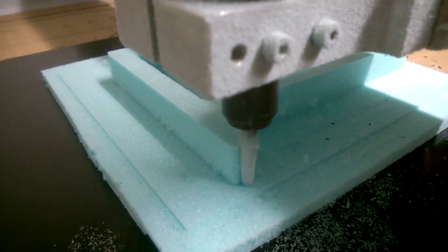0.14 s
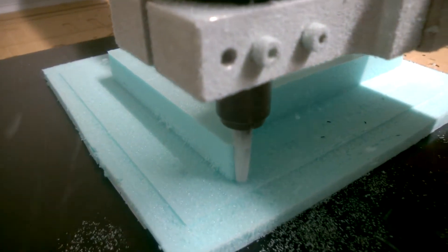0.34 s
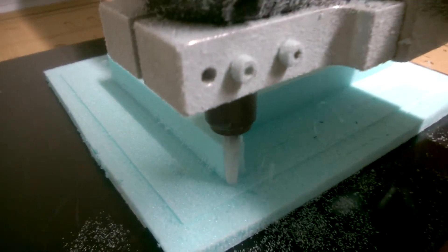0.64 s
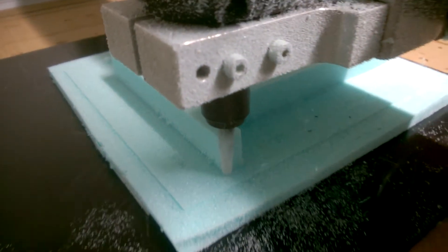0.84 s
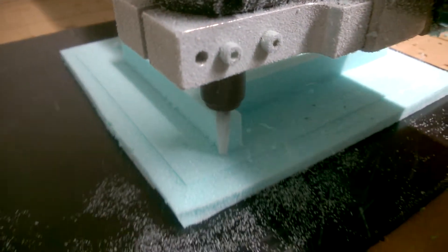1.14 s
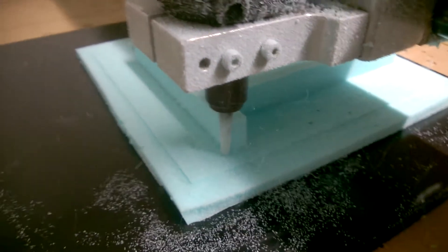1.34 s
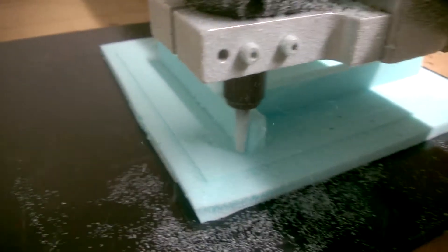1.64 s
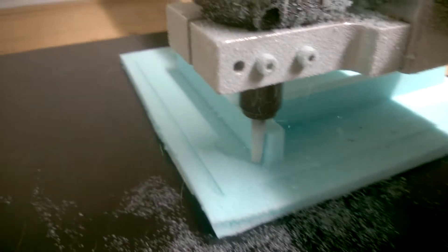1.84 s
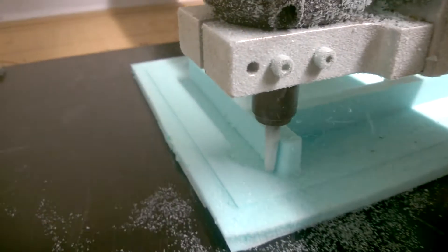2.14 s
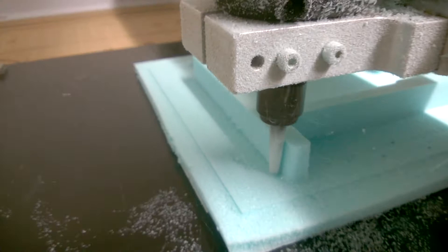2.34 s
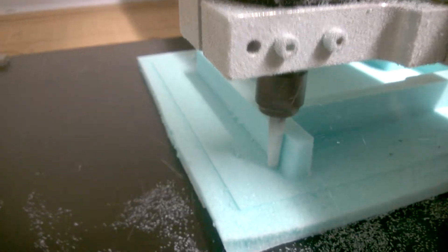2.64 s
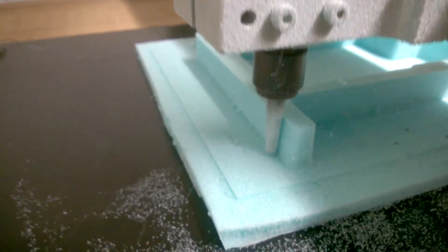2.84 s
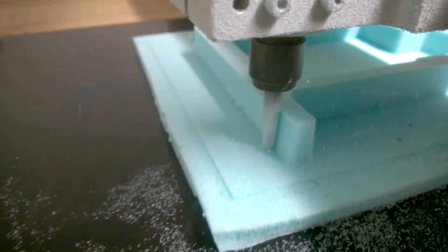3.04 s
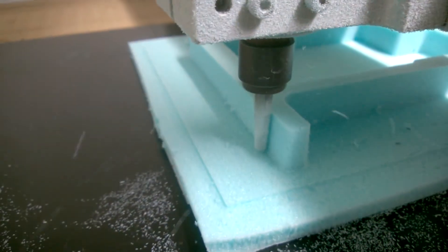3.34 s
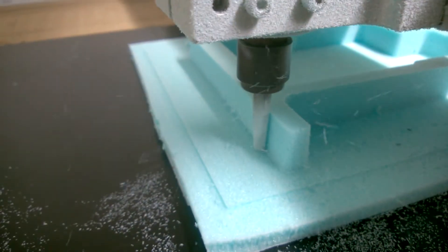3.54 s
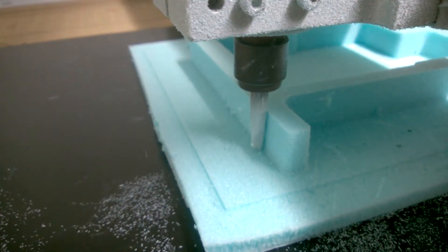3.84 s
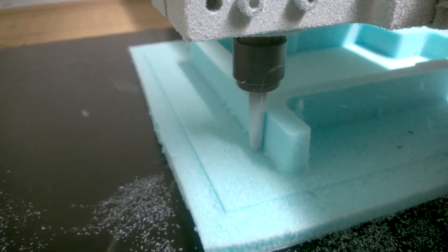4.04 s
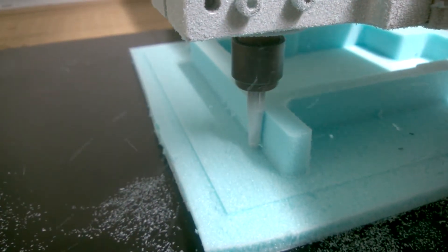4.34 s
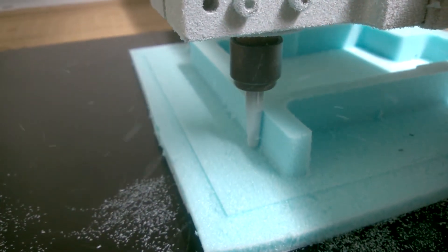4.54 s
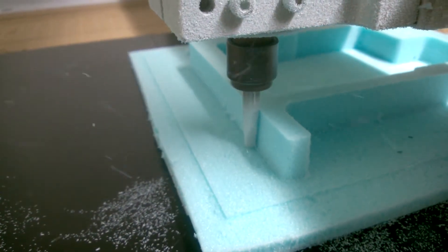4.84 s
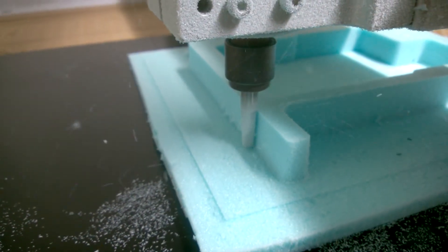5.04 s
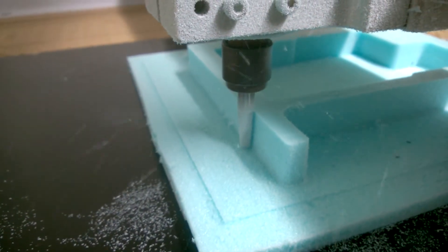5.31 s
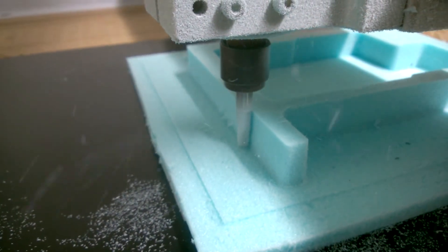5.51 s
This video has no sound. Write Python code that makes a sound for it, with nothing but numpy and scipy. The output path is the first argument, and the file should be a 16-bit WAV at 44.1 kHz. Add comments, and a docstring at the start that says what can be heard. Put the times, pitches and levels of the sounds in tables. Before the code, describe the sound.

A small router spindle mills foam board very close to the microphone, holding a steady high whine for nearly six seconds. From the start its cooling air blows on the left side of the microphone, a loud rumbling rush with some hiss and a few dull pops between 0.8 and 1.2 seconds. The gusts then weaken and are mostly gone by 3 seconds. The whine dips briefly around 0.7 seconds. From about 1.1 seconds the cutter squeals and chatters in quick, uneven bites, strongest until about 3 seconds, with short piercing notes and a fine sizzle of tearing foam. The whine moves to the right from about 2.3 seconds. After 4 seconds the squealing calms into lighter nibbling while the high whine and sizzle continue to the end. Thin bearing whistles, a soft fan rush and a faint motor hum lie underneath throughout.

```python
"""Router spindle milling foam board, very close

The cutter whines on multiples of the spindle speed and chatters just below them; foam cells tear.
The bearings sing, the feed motors hum, the fan rushes.
At first the cooling air of the spindle blows on the left microphone port."""
import sys
import numpy as np
from scipy import signal
from scipy.io import wavfile
from scipy.ndimage import uniform_filter1d

SR = 44100
rng = np.random.default_rng(int(sys.argv[2]) if len(sys.argv) > 2 else 0)


def master_out(mix):
    """Clip the mix to full scale and print it as 16-bit PCM to the path in sys.argv[1]."""
    frames = np.transpose(np.atleast_2d(mix))
    ceiling = np.clip(frames, -1, 1)
    pcm = np.round(ceiling * 32767).astype(np.int16)
    wavfile.write(sys.argv[1], SR, pcm)


N = 250047
TIME = np.arange(N) / SR
BLOCK = 64  # samples per slow value
CUTOFF_HZ = 15800
CHATTER_WIDTH_HZ, SKIRT_WIDTH_HZ, SKIRT_BELOW_HZ = 4.5, 27, 22

# Spindle speed. Each row: time in seconds, revolutions per second.
SPINDLE_SPEED = [(0, 189.2), (.8, 189.3), (1.2, 189.9), (1.8, 189), (2.4, 188.1), (3.3, 188.4),
                 (4.2, 188.8), (5.67, 188.85)]
FINAL_SPEED_HZ = SPINDLE_SPEED[-1][1]
# Chatter. Each row: time in seconds, power share 0-1, offset below the locked lines in Hz.
CHATTER_SLIP = [(0, 0.3, 14.6), (0.801, 0.47, 22.6), (1.3, .94, 33), (2.9, .96, 29), (3.7, .65, 20),
                (4.4, .35, 17), (5.67, .25, 15)]
# Whine position. Each row: time in seconds, left over right in dB near 3.5 kHz, the same near 7 kHz.
WHINE_PAN = [(0.0, 3, -2), (1.15, 4.5, -2.5), (1.44, -2.5, -11), (1.71, 5.5, -6), (2.3, -6, -18),
             (2.59, 1, -14), (2.81, -8, -38), (3.09, -10.5, -44), (4.22, -15, -55), (5.67, -4, -31)]
# Loudness of bearing tones and fan rush, dipping near 0.65 s. Each row: time in seconds, gain in dB.
MOTOR_GAIN = [(0, -2), (.4, -1), (.65, -11), (.9, -7), (1.3, -1), (2, -1), (3, -0.5), (4.3, 0), (5.67, 0.5)]
# High whine. Each row: time in seconds, then collet, flutes, rasp and foam sizzle in relative dB.
HIGH_LEVELS = [(0.0, -36.5, -41.5, -37, -37.5), (0.31, -33.5, -37, -42, -38), (0.7, -47, -45, -53, -48),
               (1.14, -30, -31.5, -39.5, -40), (1.61, -30, -36.5, -36.5, -36.5),
               (2.24, -34, -37, -41.5, -40), (2.4, -29, -40, -35, -40.5), (2.53, -30.5, -37.5, -42, -37),
               (3.65, -38.5, -33, -37, -40), (4.74, -33, -31.5, -43, -43), (4.82, -37, -32, -41, -42.5),
               (5.6, -33, -34.5, -47, -38.5)]


def from_db(db):
    """Decibels to gain."""
    return 10 ** (np.asarray(db) / 20)


def rms_one(x):
    """Scale to unit power."""
    return x / np.sqrt(np.mean(np.abs(x) ** 2) + 1e-20)


def in_time(rows):
    """Each value column of a curve at every sample."""
    times_s, *columns = np.transpose(rows)
    return [np.interp(TIME, times_s, column) for column in columns]


def at_hz(points, hz):
    """Read a spectrum on a log-frequency axis."""
    points_hz, values = np.transpose(points)
    return np.interp(np.log(hz), np.log(points_hz), values)


def bumps(rows, half_s):
    """A bell of the given height at each time."""
    return sum(height * np.exp(-np.minimum(((TIME - s) / half_s) ** 2, 20)) for s, height in rows)


def left_right(pan_db):
    """Two gains of mean power 1."""
    return np.sqrt(2 / (1 + from_db(np.array([-2 * pan_db, 2 * pan_db]))))


def two_ports(tone, apart_rad, pan_db):
    """The two ports hear a tone at different phases and levels."""
    return np.array([tone.real, (tone * np.exp(1j * apart_rad)).real]) * left_right(pan_db)


def flutter(width_hz):
    """Slow complex noise of unit power, one value per block."""
    pole = np.exp(-2 * np.pi * width_hz * BLOCK / SR)
    white = rng.standard_normal((2, 2 * (N // BLOCK + 2)))
    slow = signal.lfilter([1], [1, -2 * pole, pole * pole], white[0] + 1j * white[1])
    return rms_one(slow[len(slow) // 2:])


def smooth_up(slow):
    """Interpolate block values to every sample."""
    slow = slow.astype(np.complex64)
    ramp = np.arange(BLOCK, dtype=np.float32) / BLOCK
    return (slow[:-1, None] + np.diff(slow)[:, None] * ramp).ravel()[:N]


def bandpass(x, low_hz, high_hz):
    """Butterworth band-pass."""
    return signal.sosfilt(signal.butter(2, [low_hz, high_hz], "band", fs=SR, output="sos"), x)


def noise_bands(top_hz):
    """Yield centre in Hz and stereo noise for half-octave bands of equal density."""
    edges_hz = CUTOFF_HZ / 2 ** np.arange(0, 10, .5)[::-1]
    white = rng.standard_normal((2, 2, N))
    for k, (low_hz, high_hz) in enumerate(zip(edges_hz, edges_hz[1:])):
        if low_hz < top_hz:
            yield np.sqrt(low_hz * high_hz), bandpass(white[k % 2], low_hz, high_hz)


def grip():
    """Cutter engagement in dB: each bite catches at once, holds and lets go."""
    # Bites. Each row: start in seconds, end in seconds, grip in dB.
    bites = [(.02, .085, -1), (.098, .121, 7), (.141, .184, 3.5), (.219, .259, 5.5), (.265, .33, 6),
             (.365, .397, 3), (.435, .455, 8), (.465, .523, 6), (.579, .587, 11), (.813, .835, -5),
             (.857, .881, 3), (.904, .929, 7.5), (.955, .968, 9), (.985, 1.045, 0), (1.062, 1.088, 6),
             (1.134, 1.166, 7.5), (1.192, 1.216, 8), (1.24, 1.292, 4), (1.33, 1.372, 5.5),
             (1.395, 1.427, 3), (1.457, 1.476, 3.5), (1.522, 1.64, 4.5), (1.654, 1.711, 4),
             (1.735, 1.765, 2), (1.77, 1.798, 7.5), (1.852, 1.87, 5.5), (1.878, 1.912, 5.5),
             (1.932, 1.994, 1), (2.01, 2.068, 5.5), (2.115, 2.148, 3.5), (2.172, 2.27, 1),
             (2.301, 2.474, 3.5), (2.408, 2.434, 11), (2.506, 2.597, 5), (2.617, 2.66, 5),
             (2.703, 2.752, 5), (2.76, 2.81, -0.5), (2.821, 2.869, 8.5), (2.902, 2.916, 3),
             (2.948, 2.961, 4.5), (2.974, 2.997, 1), (3.033, 3.063, 7.5), (3.068, 3.085, 2),
             (3.11, 3.146, 4), (3.161, 3.176, 6.5), (3.196, 3.248, 1), (3.26, 3.335, 2), (3.365, 3.383, 3),
             (3.404, 3.422, 3.5), (3.436, 3.461, 1), (3.498, 3.539, 6), (3.561, 3.589, 6), (3.609, 3.62, 3),
             (3.634, 3.648, 4), (3.662, 3.683, 2.5), (3.731, 3.755, 8), (3.769, 3.799, 2), (3.83, 3.902, 5),
             (3.915, 3.963, 6.5), (4.015, 4.046, 3), (4.058, 4.078, 6)]
    # Spans of random nibbling. Each row: start in seconds, end in seconds.
    nibbling = [(.6, .8), (4.12, 5.67)]
    # Grip left between bites. Each row: time in seconds, grip in dB.
    slack = [(0, -6), (1.3, -8), (1.8, -4), (2.7, -5.5), (3.1, -8.5), (4.2, -6), (5.67, -15)]
    nibble_s, gap_s, nibble_db = (.014, .06), (.01, .026), 3.8
    rise_db_per_s, fall_db_per_s = 1200, 1100
    nibbles = []
    for start_s, stop_s in nibbling:
        while start_s < stop_s:
            end_s = start_s + rng.uniform(*nibble_s)
            nibbles.append((start_s, end_s, nibble_db + rng.standard_normal()))
            start_s = end_s + rng.uniform(*gap_s)
    time_s = TIME[::32]
    start_s, end_s, level_db = np.transpose(list(bites) + nibbles)[:, :, None]
    each_db = (level_db - rise_db_per_s * np.maximum(start_s - time_s, 0)
               - fall_db_per_s * np.maximum(time_s - end_s, 0))
    return np.maximum(np.interp(TIME, time_s, each_db.max(axis=0)), in_time(slack)[0])


def resonance_levels():
    """Relative dB of each resonance; cutter and foam wall ring up, swing with the grip, then calm."""
    # Spindle body whine. Each row: time in seconds, level in relative dB.
    body_curve = [(0, -22.5), (.25, -27), (.65, -31.5), (1.2, -24.5), (1.5, -40), (2.2, -35), (2.5, -33.5),
                  (3.8, -31.5), (5.67, -39)]
    # Ringing. Each row: time in seconds, cutter squeal and foam wall in relative dB.
    ringing = [(0, -37.5, -37), (.6, -44, -44.5), (.9, -34.5, -31.5), (1.2, -26, -25), (1.9, -24.5, -25),
               (2.25, -29, -29.5), (2.5, -31, -29), (3.1, -27, -37), (4.4, -38.5, -51.5), (5.6, -46, -49)]
    grip_db = grip()
    body, = in_time(body_curve)
    squeal, wall = in_time(ringing)
    collet, flutes, rasp, sizzle = in_time(HIGH_LEVELS)
    return (body + .65 * grip_db, squeal + grip_db, wall + .75 * grip_db,
            collet + .2 * grip_db, flutes, rasp + .1 * grip_db, sizzle)


def self_limit(slow):
    """Self-excited ringing limits its own height, so mostly its phase wanders."""
    return rms_one(slow / (np.abs(slow) + .1))


def whine(turn_rad, bite, orders, partials_db, level_db, pan_db, *,
          skirt, own, scatter_rad, slip_scale, swell_db, wander_db, apart_rad, even_blocks=45):
    """Evenly spaced partials, each a locked line, a chatter line below it and a ragged skirt."""
    # skirt: power share of the skirt; own: share of flutter not common to all partials
    slow_bite, fast_bite = bite
    time_s = np.arange(len(slow_bite)) * BLOCK / SR
    points_s, share, slip_hz = np.transpose(CHATTER_SLIP)
    share = np.interp(time_s, points_s, share)
    slip_cycles = np.cumsum(np.interp(time_s, points_s, slip_hz)) * BLOCK / SR
    locked = np.sqrt((1 - skirt) * (1 - share))
    slipping = np.sqrt((1 - skirt) * share) * np.exp(-2j * np.pi * slip_scale * slip_cycles)
    trailing = np.sqrt(skirt) * np.exp(-2j * np.pi * slip_scale * SKIRT_BELOW_HZ * time_s)
    rotation = np.exp(1j * turn_rad).astype(np.complex64)
    carrier, step = rotation ** int(orders[0]), rotation ** int(orders[1] - orders[0])
    tone, power = np.zeros(N, np.complex64), 0
    for gain in from_db(partials_db):
        slow = self_limit(np.sqrt(1 - own) * slow_bite + np.sqrt(own) * flutter(CHATTER_WIDTH_HZ))
        fast = np.sqrt(1 - own) * fast_bite + np.sqrt(own) * flutter(SKIRT_WIDTH_HZ)
        wander = from_db(wander_db * flutter(2.5).real)
        # the less the phases scatter, the more each revolution is one burst
        scatter = np.exp(1j * scatter_rad * rng.standard_normal())
        swing = gain * wander * (locked + slipping * slow + trailing * fast) * scatter
        tone += smooth_up(swing) * carrier
        carrier = carrier * step
        power = power + np.abs(swing) ** 2
    running_rms = np.sqrt(uniform_filter1d(power, size=even_blocks))
    swell = from_db(swell_db * flutter(17).real) / running_rms
    return 2 * two_ports(tone * smooth_up(swell).real * from_db(level_db), apart_rad, pan_db)


def cutter(turn_rad, levels_db):
    """Every revolution excites the resonances of spindle, cutter and foam."""
    # Strongest partials. Each row: multiple of the speed, level in relative dB.
    partials = [(16, -14), (17, -11), (18, 0), (19, -14.5), (20, -5.5), (21, -5.5), (22, -7), (23, -16),
                (24, -9), (25, -15), (26, -13.5), (27, -19), (28, -12), (29, -12), (30, -14), (31, -20),
                (32, -19), (33, -19), (34, -15), (35, -24), (36, -20)]
    # Spectrum above those. Each row: frequency in Hz, level in relative dB.
    treble = [(4060, -32), (6900, 5), (8150, 12), (8640, 10), (9560, 9.5), (10300, 1), (11800, -7),
              (14200, -10), (15100, -13), (15800, -9)]
    # Topmost fizz. Each row: time in seconds, dB added to the sizzle curve.
    fizz_curve = [(0, -9), (1.2, -14.5), (2.6, -10), (3.6, -10), (4.6, -4), (5.67, -7)]
    # Brief shrieks an octave above the foam wall's ringing. Each row: time in seconds, gain in dB.
    shrieks = [(1.35, -35), (1.68, -50), (1.79, -33), (1.9, -30.5), (2.05, -33), (2.42, -30), (2.83, -42)]
    orders, partials_db = np.transpose(partials)
    body, squeal, wall, collet, flutes = np.split(np.arange(len(orders)), [2, 4, 8, 11])
    octave, rasp, sizzle, fizz = [40, 42, 44], np.arange(37, 46), np.arange(46, 56), np.arange(56, 84)
    body_db, squeal_db, wall_db, collet_db, flutes_db, rasp_db, sizzle_db = levels_db
    low_pan_db, high_pan_db = in_time(WHINE_PAN)
    mid_pan_db = (low_pan_db + high_pan_db) / 2
    fizz_db = sizzle_db + in_time(fizz_curve)[0]
    bite = flutter(CHATTER_WIDTH_HZ), flutter(SKIRT_WIDTH_HZ)  # uneven bite, common to all resonances

    def low_whine(rows, level_db, pan_db, **texture):
        return whine(turn_rad, bite, orders[rows], partials_db[rows], level_db, pan_db, **texture)

    def high_whine(multiples, level_db, pan_db, **texture):
        treble_db = at_hz(treble, multiples * FINAL_SPEED_HZ)
        return whine(turn_rad, bite, multiples, treble_db, level_db, pan_db, wander_db=3.5, **texture)

    out = low_whine(body, body_db - 6.8, low_pan_db + 6, skirt=.33, own=.3, scatter_rad=.4,
                    slip_scale=.7, swell_db=1.5, wander_db=1, apart_rad=.6, even_blocks=15)
    out += low_whine(squeal, squeal_db - 1.5, low_pan_db - .5, skirt=.01, own=.1, scatter_rad=.6,
                     slip_scale=1, swell_db=1.5, wander_db=.6, apart_rad=.55, even_blocks=11)
    out += low_whine(wall, wall_db - 1, low_pan_db + .8, skirt=.005, own=.7, scatter_rad=2.5,
                     slip_scale=.85, swell_db=1.5, wander_db=2, apart_rad=1.75, even_blocks=27)
    out += low_whine(collet, collet_db - 3.5, mid_pan_db, skirt=.08, own=.6, scatter_rad=1.3,
                     slip_scale=1, swell_db=1.8, wander_db=2, apart_rad=1.8)
    out += low_whine(flutes, flutes_db - 2, high_pan_db + .5, skirt=.18, own=.5, scatter_rad=.6,
                     slip_scale=1.1, swell_db=1.5, wander_db=1, apart_rad=1.5)
    out += high_whine(rasp, rasp_db - 4.5, high_pan_db - .5, skirt=.56, own=.85, scatter_rad=.15,
                      slip_scale=.93, swell_db=3.5, apart_rad=1.77)
    out += high_whine(sizzle, sizzle_db - 3, high_pan_db + 1, skirt=1, own=.36, scatter_rad=.18,
                      slip_scale=.77, swell_db=1.3, apart_rad=1.4)
    out += high_whine(fizz, fizz_db, .23 * high_pan_db, skirt=.2, own=.35, scatter_rad=.6,
                      slip_scale=.4, swell_db=1, apart_rad=1.8)
    shriek = whine(turn_rad, bite, octave, np.zeros(3), -3, high_pan_db, skirt=.1, own=.3,
                   scatter_rad=1.5, slip_scale=2, swell_db=1, wander_db=1, apart_rad=1.5)
    return out + shriek * bumps([(s, from_db(db)) for s, db in shrieks], half_s=.02)


def tearing_foam(turn_rad, levels_db):
    """Foam cells tear in one burst of hiss per revolution, each of random strength."""
    revolution = (turn_rad / (2 * np.pi) + .5).astype(int)
    strength = from_db(2 * rng.standard_normal(revolution[-1] + 1))[revolution]
    gate = rms_one(strength * np.exp(1.4 * np.cos(turn_rad)))
    body_db, _, _, _, flutes_db, rasp_db, sizzle_db = levels_db
    out = 0
    for low_hz, high_hz, level_db in [(3130, 3340, body_db - 12), (5100, 6200, flutes_db - 13),
                                      (6200, 8200, rasp_db - 4), (8200, 10430, sizzle_db - 3.5)]:
        hiss = bandpass(gate * rng.standard_normal((2, N)), low_hz, high_hz)
        out = out + rms_one(hiss) * from_db(level_db)
    return out * left_right(in_time(WHINE_PAN)[1])


def spindle_tones(turn_rad, tones, waver, pan_db):
    """Wavering tones that follow the spindle speed."""
    port_rad = np.array([[0], [.8]])
    out = np.zeros((2, N))
    for hz, level_db in tones:
        tone = np.exp(1j * hz / FINAL_SPEED_HZ * turn_rad) * (1 + waver * smooth_up(flutter(5)))
        phase_rad = rng.uniform(0, 2 * np.pi) + port_rad
        out += from_db(level_db) * (tone * np.exp(1j * phase_rad)).real
    return np.sqrt(2) * out * left_right(pan_db)[:, None]


def spindle_motor(turn_rad):
    """Bearings sing, whistle and hum, unbalance drones at twice the speed."""
    # Bearing, whistle and ball-pass tones. Each row: frequency at final speed in Hz, relative dB.
    bearing_tones = [(565, -62), (867, -59), (1281, -55), (1357, -62), (1545, -61), (1888, -62),
                     (2035, -52.5), (2223, -59), (2412, -51), (2643, -46), (2708, -57), (2832, -50),
                     (3021, -47), (3210, -48)]
    whistle_tones = [(4155, -40.5), (4342, -44), (4533, -39.5), (4893, -42), (5352, -38), (5421, -32.5),
                     (6402, -54)]
    ball_pass_tones = [(678, -47), (755, -55), (1168, -59)]
    # Ball-pass hum of the bearings. Each row: time in seconds, gain in dB.
    hum_gain = [(0, -2), (.65, -15), (1.3, 3.5), (2.9, 1.5), (3.7, -4), (4.6, -2.5), (5.1, 3), (5.67, 1)]
    bearings = spindle_tones(turn_rad, bearing_tones, waver=.25, pan_db=-10)
    bearings *= from_db(in_time(MOTOR_GAIN)[0] + 1.5)
    hum = from_db(in_time(hum_gain)[0]) * spindle_tones(turn_rad, ball_pass_tones, waver=.2, pan_db=-5)
    whistles = spindle_tones(turn_rad, whistle_tones, waver=.35, pan_db=-15)
    whistles *= from_db(in_time(HIGH_LEVELS)[1] + 26)  # follows the flutes
    unbalance = spindle_tones(turn_rad, [(2 * FINAL_SPEED_HZ, -59)], waver=.95, pan_db=18)
    return bearings + hum + whistles + unbalance


def feed_motors():
    """Two steppers hum at their step rates, shaken by the gantry, and hand over at the corner."""
    # Feed axes. Each row: time in seconds, step rate in Hz, level in dB.
    x_axis = [(0, 171, -36), (.45, 180, -44), (.7, 143, -53), (.95, 116, -56), (1.1, 100, -80)]
    y_axis = [(.6, 163, -85), (.85, 192, -62), (1.1, 198, -57), (1.5, 186.6, -69), (1.8, 166.2, -64),
              (5.67, 162, -58)]
    out = 0
    for axis, roughness in [(x_axis, 1), (y_axis, .46)]:
        step_hz, level_db = in_time(axis)
        hum = np.exp(2j * np.pi * np.cumsum(step_hz) / SR) * (1 + roughness * smooth_up(flutter(23)))
        out = out + from_db(level_db) * rms_one(hum.real)
    return out


def cooling_fan():
    """The fan rushes throughout; its stream hisses while it points at the microphone."""
    # Fan and stream spectra. Each row: frequency in Hz, density in relative dB.
    fan_spectrum = [(30, -1.5), (100, -41), (170, -1), (280, -5), (550, 3.5), (800, -1.5), (1300, -3.5),
                    (2000, -8), (2700, 0), (3400, -5), (4600, -6), (6500, -4), (9500, -12.5), (12000, -14),
                    (15500, -20)]
    stream_spectrum = [(100, -11), (1500, 2), (2400, -22), (3300, -5), (4500, -17), (6500, 2), (9500, -6),
                       (11000, -4), (15500, -5)]
    # Fan position. Each row: frequency in Hz, left over right in dB.
    fan_pan = [(40, 0), (200, -2.5), (600, 0), (1300, -9.5), (2500, 5), (5500, -5.5), (9000, 0),
               (15000, 25)]
    # Stream hiss. Each row: time in seconds, level in dB.
    stream_level = [(0, -33.5), (.4, -38), (.65, -42.5), (.9, -40), (1.15, -35.5), (1.5, -41.5),
                    (5.67, -106)]
    fan, stream = 0, 0
    for hz, band in noise_bands(CUTOFF_HZ):
        fan = fan + band * from_db(at_hz(fan_spectrum, hz)) * left_right(at_hz(fan_pan, hz))[:, None]
        stream = stream + band * from_db(at_hz(stream_spectrum, hz))
    rush = from_db(in_time(MOTOR_GAIN)[0] - 37) * rms_one(fan)
    return rush + from_db(in_time(stream_level)[0]) * rms_one(stream)


def airflow():
    """Strength and reach in Hz of the air on the port: gusts over a fading breeze."""
    # Gusts. Each row: start and end in seconds, level in relative dB, reach in Hz, sag in dB/s.
    gusts = [(-.05, 0.727, -20, 697, 1), (0.768, 1.106, -25.5, 1230, -1.5), (1.134, 1.268, -30, 300, -38),
             (1.541, 2.05, -29.5, 266, 4.5), (2.457, 2.633, -32, 336.4, 13)]
    # Puffs and lulls. Each row: time in seconds, gain in dB.
    puffs = [(1.345, 9), (1.48, -16), (1.555, 5), (1.645, -8), (1.695, 4), (1.775, 6.5), (2.0, 4),
             (2.035, -7), (2.11, 7.5), (2.22, 5), (2.38, -3), (2.51, -13), (2.54, 3), (2.665, 9.5)]
    breeze_db, breeze_reach_hz, fade_db_per_s = -27.5, 385, 7
    rise_db_per_s, fall_db_per_s = 296, 139
    reach_exponent = .47  # weaker air is duller
    fading = from_db(-fade_db_per_s * TIME)
    power = (from_db(breeze_db) * fading) ** 2
    reach_hz = breeze_reach_hz * fading ** reach_exponent
    for start_s, end_s, level_db, top_hz, sag_db_per_s in gusts:
        shape = from_db(-rise_db_per_s * np.maximum(start_s - TIME, 0)
                        - sag_db_per_s * np.maximum(TIME - start_s, 0)
                        - fall_db_per_s * np.maximum(TIME - end_s, 0))
        power = power + (from_db(level_db) * shape) ** 2
        reach_hz = np.maximum(reach_hz, top_hz * shape ** reach_exponent)
    puff = from_db(bumps(puffs, half_s=.0084))
    return np.sqrt(power) * puff, np.maximum(reach_hz * puff ** reach_exponent, 30)


def buffeting(lumpy_db, spiky_db, flapping_db):
    """Eddies buffet the port; faster air makes smaller ones that reach higher and come in spurts."""
    # Eddy spectrum before roll-off. Each row: frequency in Hz, density in relative dB.
    spectrum = [(20, -9.5), (50, 3.5), (150, 3), (300, 1), (800, 0), (2000, -3), (5000, 10)]
    strength, reach_hz = airflow()
    spurts = from_db(spiky_db * reach_hz / reach_hz.max() * smooth_up(flutter(190)).real)
    spurts *= from_db(flapping_db * smooth_up(flutter(23)).real)
    spurts /= np.sqrt(uniform_filter1d(spurts ** 2, size=SR // 10))
    out, low_power = 0, 0
    for hz, band in noise_bands(5000):
        gain = from_db(at_hz(spectrum, hz)) * np.exp(-hz / reach_hz)
        lumps = from_db(lumpy_db * smooth_up(flutter(64)).real)
        spurt_share = hz / (hz + 600)
        out = out + band * gain * lumps * (1 - spurt_share + spurt_share * spurts)
        if hz < 300:
            low_power = low_power + gain ** 2 * np.mean(band ** 2)
    return out / np.sqrt(low_power) * strength * from_db(7.5)


def snaps(low_hz, high_hz):
    """A single sharp eddy is a short, dull pressure pulse."""
    # Sharp eddies. Each row: time in seconds, approximate peak in dB.
    eddies = [(0.831, -7), (0.852, -4), (0.886, -10), (0.913, -10), (1.042, -13), (1.161, -11),
              (1.229, -12)]
    times_s, peak_db = np.transpose(eddies)
    clicks = np.zeros(N)
    clicks[(times_s * SR).astype(int)] = from_db(peak_db) * SR / (2 * (high_hz - low_hz))
    return bandpass(clicks + 1e-18, low_hz, high_hz)


def squeals(turn_rad, waver, apart_rad):
    """One partial catches, holds a nearly pure note just below its locked line and lets go."""
    # Squeals. Each row: start and end in seconds, multiple of the speed, level in dB.
    notes = [(1.1, 2.005, 50, -42.5), (1.4, 1.958, 52, -47), (1.2, 1.55, 27, -41), (1.52, 1.742, 25, -32),
             (1.575, 1.855, 34, -41), (2.03, 2.12, 48, -42), (2.4, 2.684, 22, -35), (2.555, 2.85, 48, -45),
             (2.704, 2.874, 25, -33), (3.347, 3.66, 49, -43), (3.544, 3.626, 50, -41),
             (3.62, 3.88, 34, -41), (3.67, 3.738, 38, -46), (4.075, 4.1, 50, -36.5), (4.21, 4.256, 36, -37)]
    edge_db_per_s = 402
    slip_rad = 2 * np.pi * np.cumsum(in_time(CHATTER_SLIP)[1]) / SR
    tone = 0
    for start_s, end_s, multiple, level_db in notes:
        outside_s = np.clip(np.maximum(start_s - TIME, TIME - end_s), 0, .5)
        envelope = from_db(level_db - edge_db_per_s * outside_s) * (outside_s < .5)
        note = envelope * np.exp(1j * (multiple * turn_rad - slip_rad))
        tone = tone + note * smooth_up(rms_one(1 + waver * flutter(14)))
    return np.sqrt(2) * two_ports(tone, apart_rad, np.mean(in_time(WHINE_PAN), axis=0))


def scene():
    """Motors, cutting and moving air."""
    turn_rad = 2 * np.pi * np.cumsum(in_time(SPINDLE_SPEED)[0]) / SR
    motors = spindle_motor(turn_rad) + feed_motors()
    levels_db = resonance_levels()
    cutting = cutter(turn_rad, levels_db) + squeals(turn_rad, waver=.3, apart_rad=1.3)
    cutting += tearing_foam(turn_rad, levels_db)
    fan = cooling_fan()
    draught = buffeting(lumpy_db=2, spiky_db=7, flapping_db=1) + snaps(low_hz=200, high_hz=1420)
    left_port = from_db([[0], [-45]])
    return cutting + motors + fan + draught * left_port


def record(dry):
    """Round the highest peaks, then low-pass steeply."""
    rounded = dry / (1 + (dry / .93) ** 6) ** (1 / 6)
    return signal.sosfilt(signal.ellip(12, .1, 90, CUTOFF_HZ, fs=SR, output="sos"), rounded)


dry = scene()
out = record(dry)
master_out(out)
```